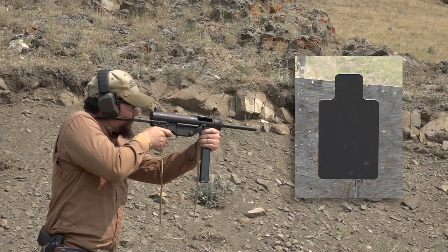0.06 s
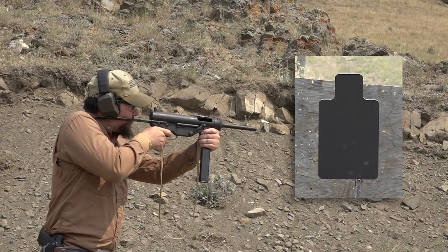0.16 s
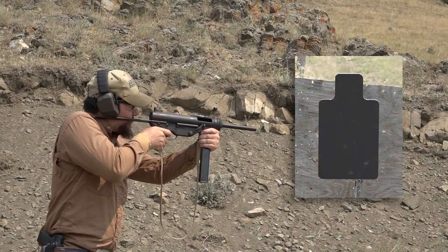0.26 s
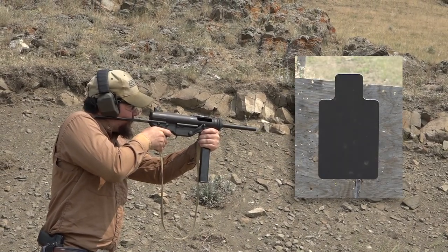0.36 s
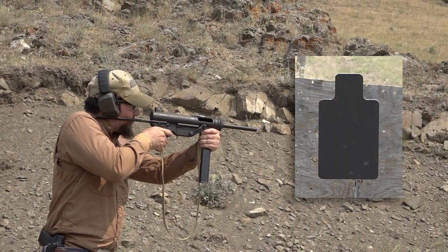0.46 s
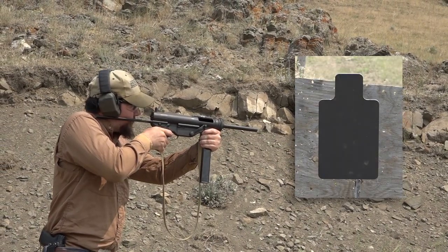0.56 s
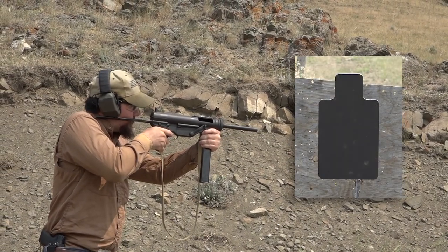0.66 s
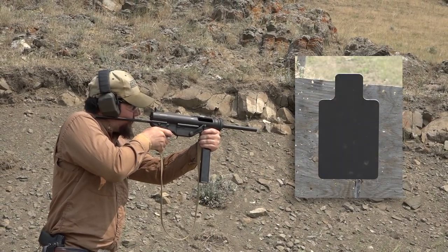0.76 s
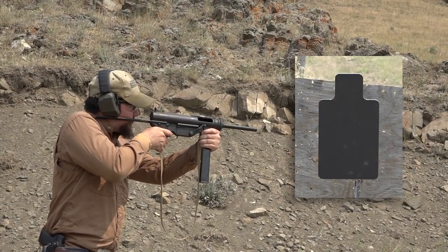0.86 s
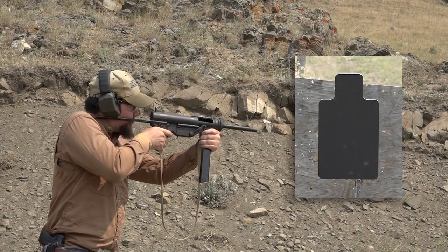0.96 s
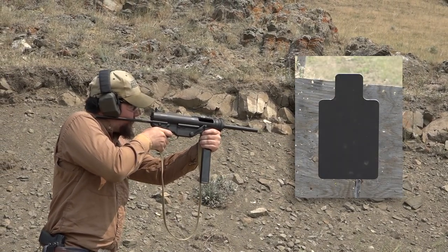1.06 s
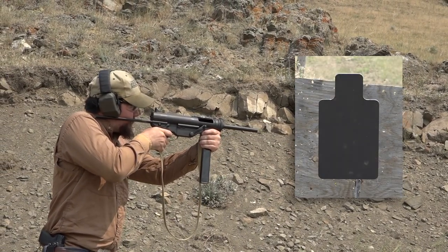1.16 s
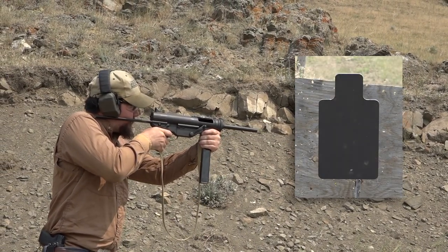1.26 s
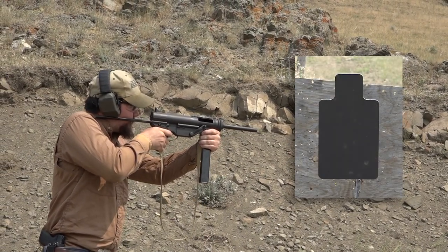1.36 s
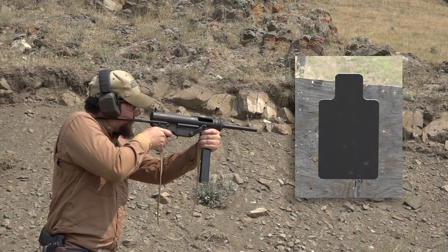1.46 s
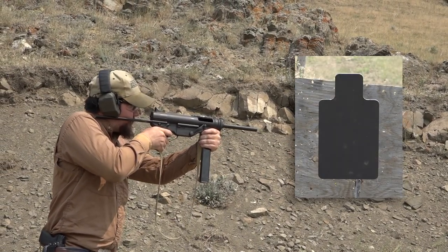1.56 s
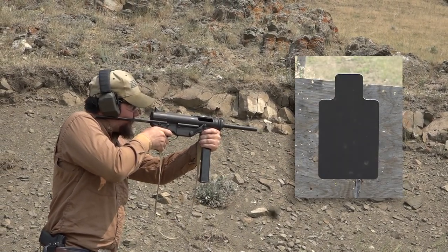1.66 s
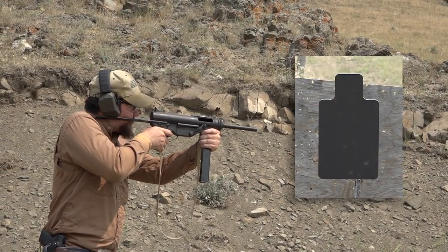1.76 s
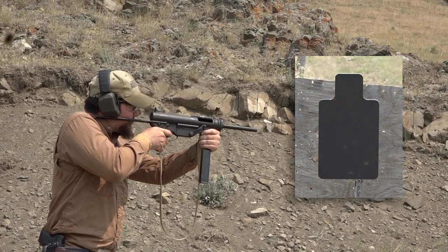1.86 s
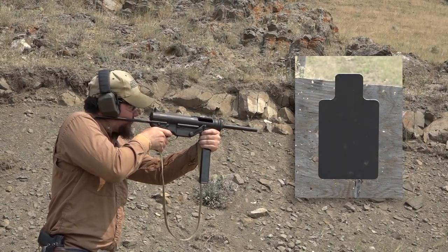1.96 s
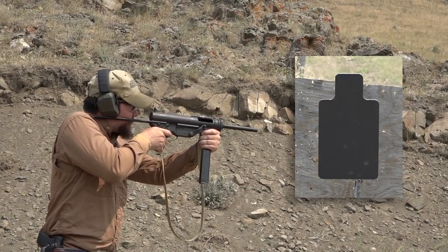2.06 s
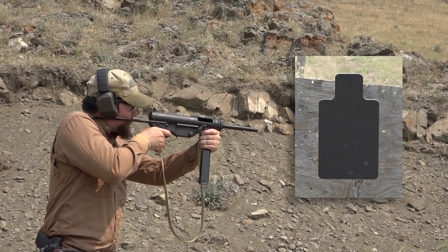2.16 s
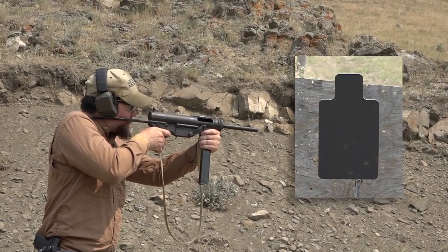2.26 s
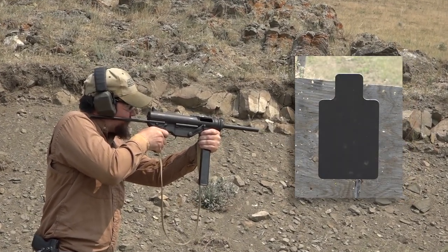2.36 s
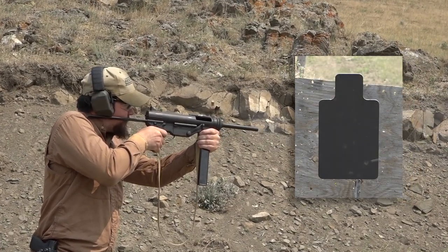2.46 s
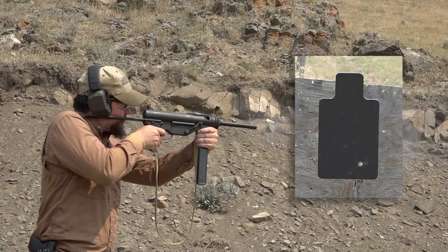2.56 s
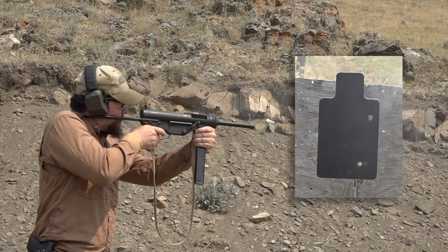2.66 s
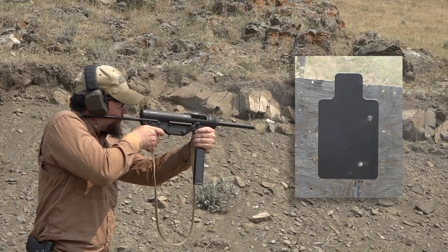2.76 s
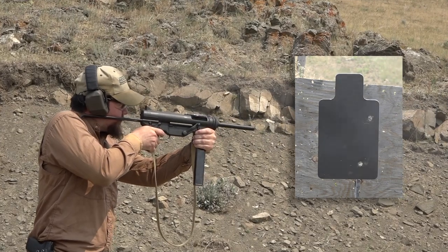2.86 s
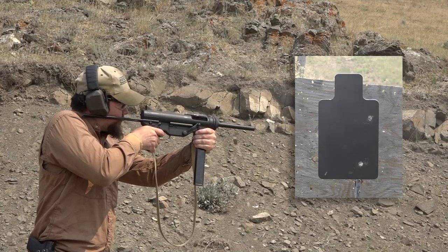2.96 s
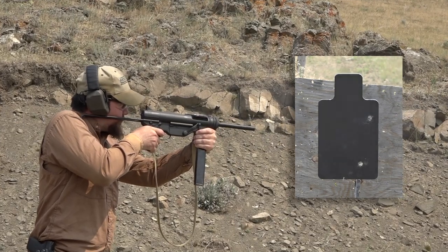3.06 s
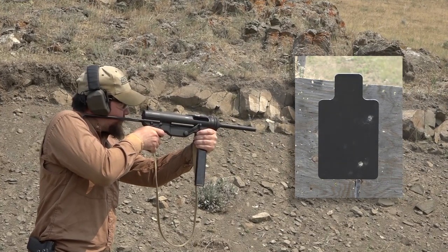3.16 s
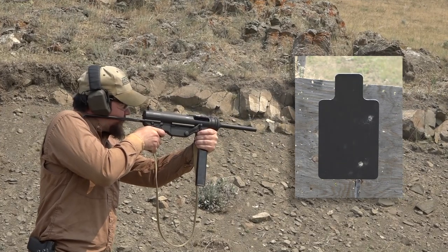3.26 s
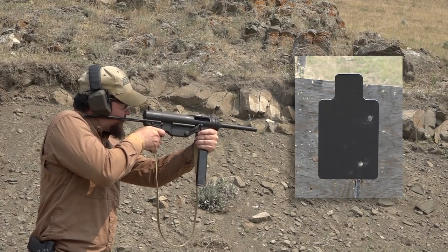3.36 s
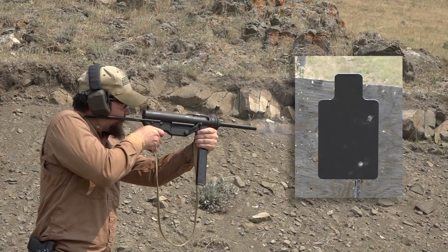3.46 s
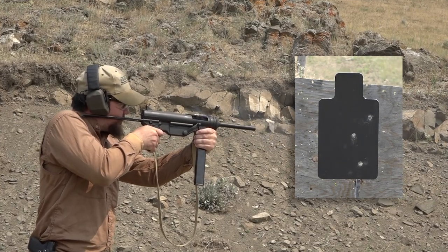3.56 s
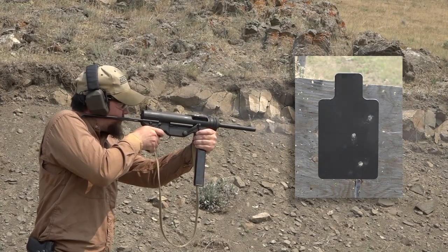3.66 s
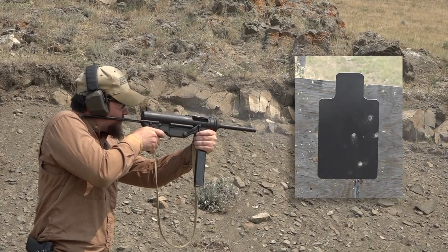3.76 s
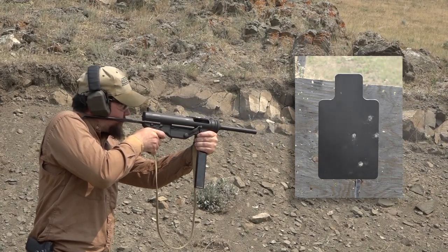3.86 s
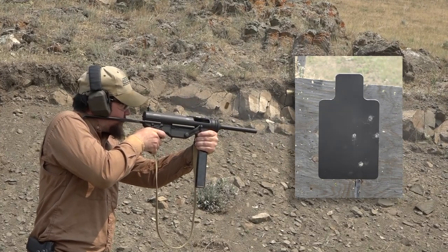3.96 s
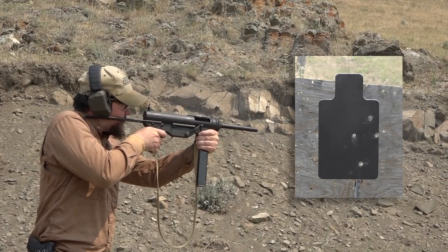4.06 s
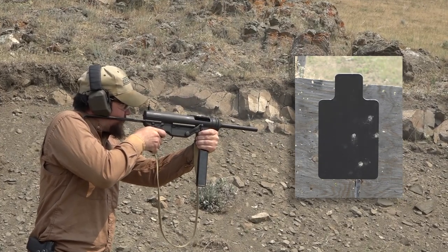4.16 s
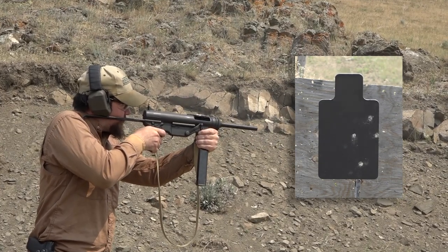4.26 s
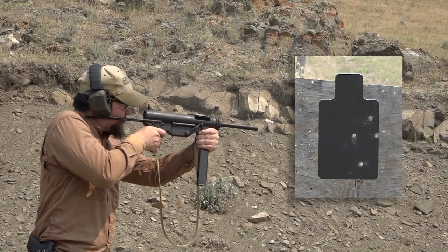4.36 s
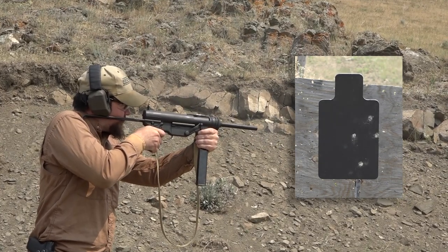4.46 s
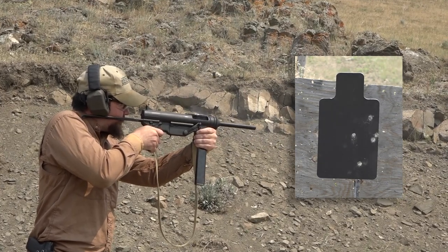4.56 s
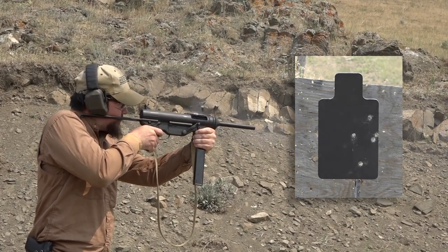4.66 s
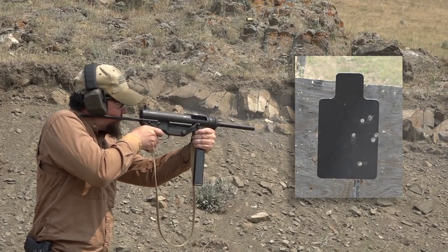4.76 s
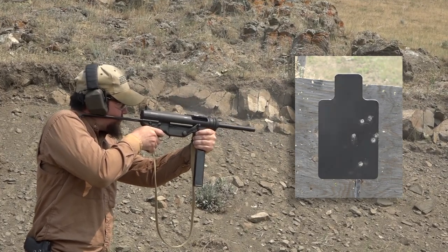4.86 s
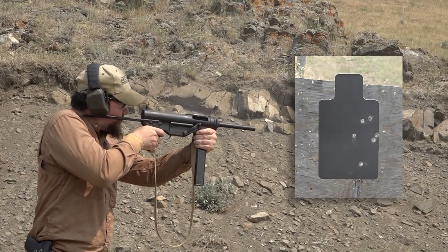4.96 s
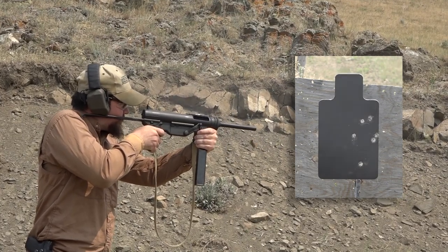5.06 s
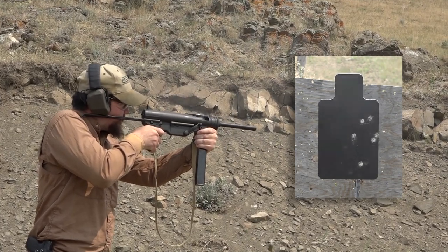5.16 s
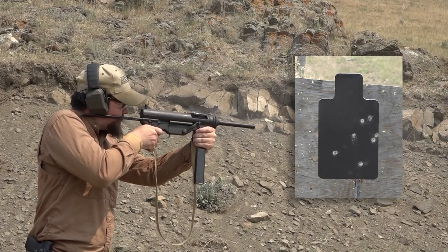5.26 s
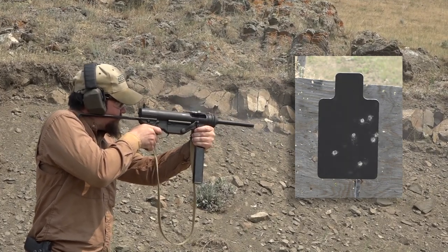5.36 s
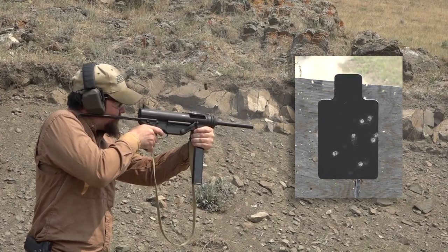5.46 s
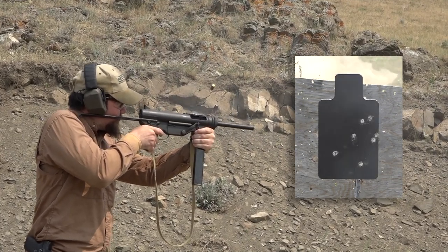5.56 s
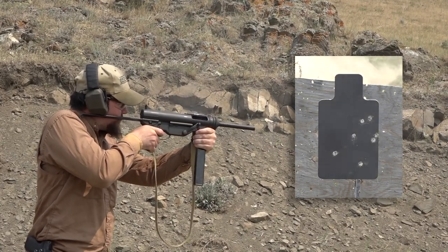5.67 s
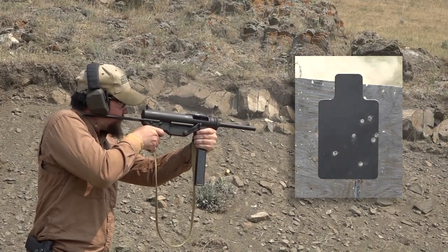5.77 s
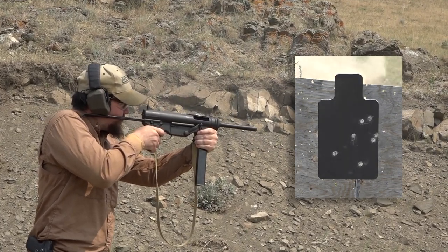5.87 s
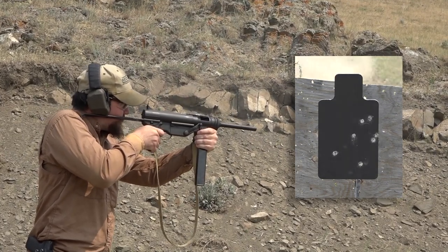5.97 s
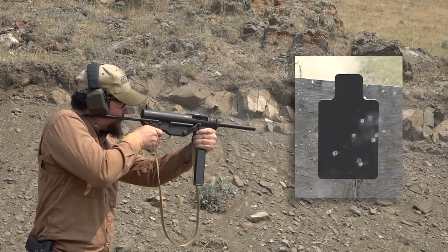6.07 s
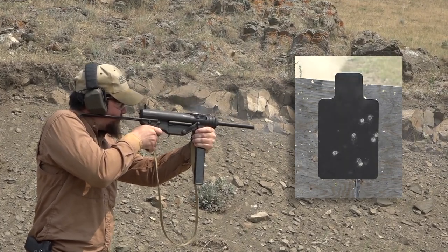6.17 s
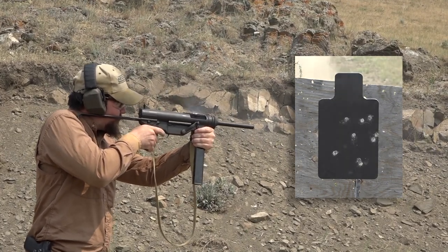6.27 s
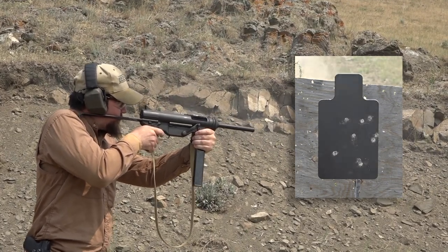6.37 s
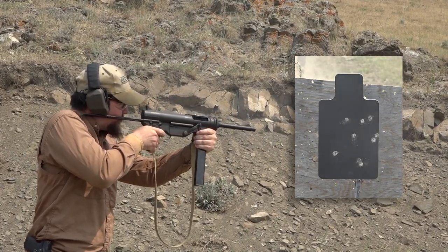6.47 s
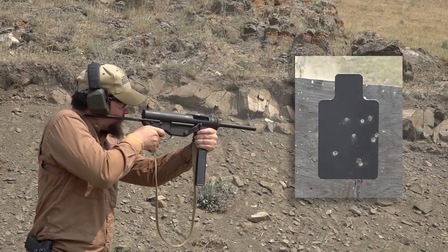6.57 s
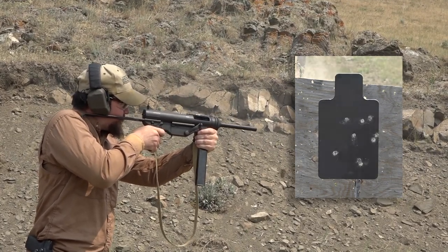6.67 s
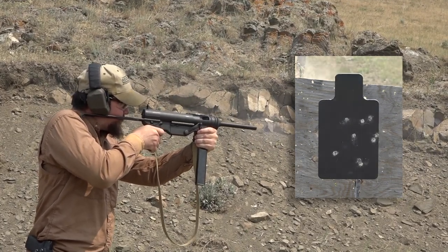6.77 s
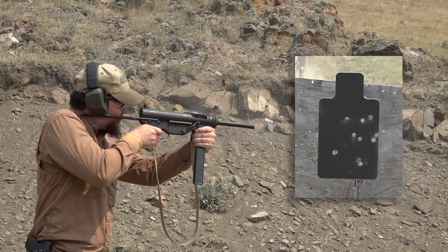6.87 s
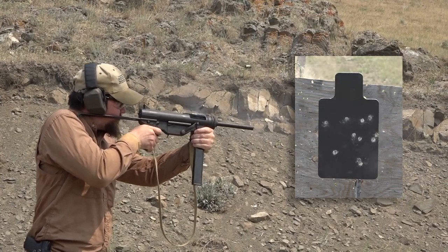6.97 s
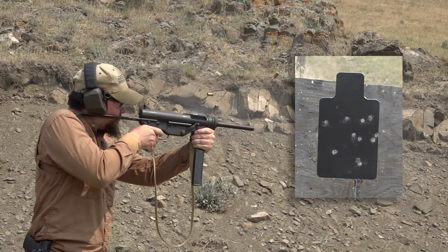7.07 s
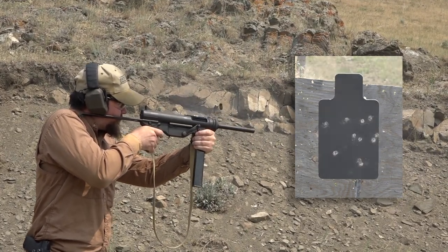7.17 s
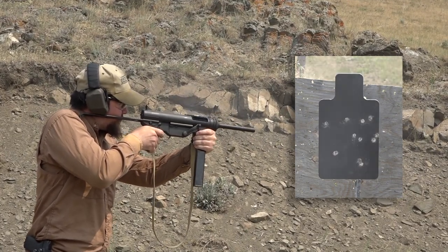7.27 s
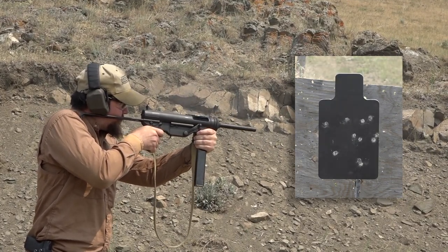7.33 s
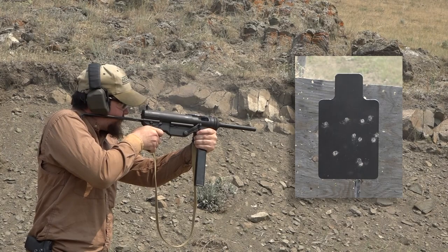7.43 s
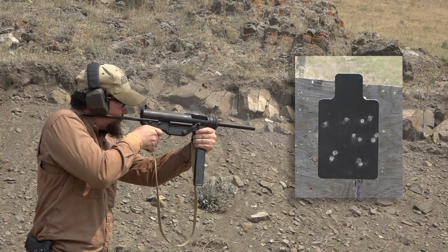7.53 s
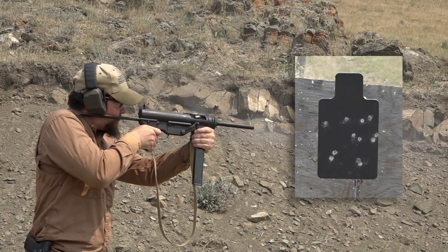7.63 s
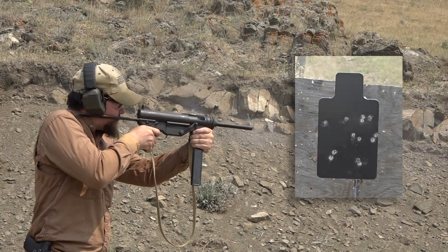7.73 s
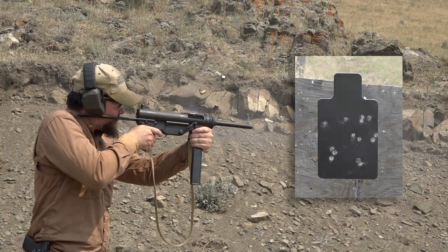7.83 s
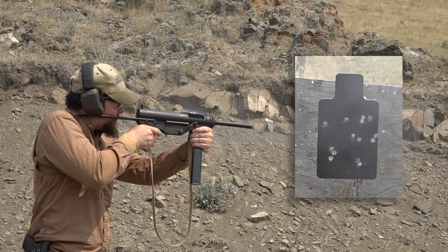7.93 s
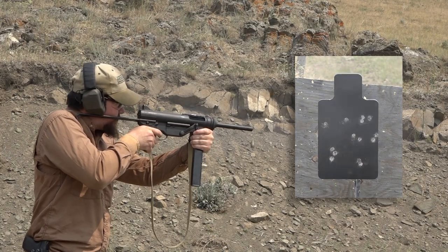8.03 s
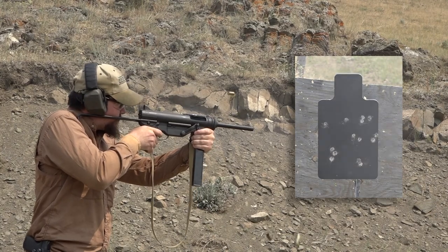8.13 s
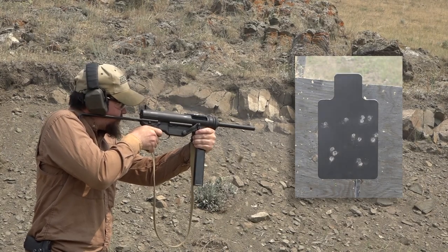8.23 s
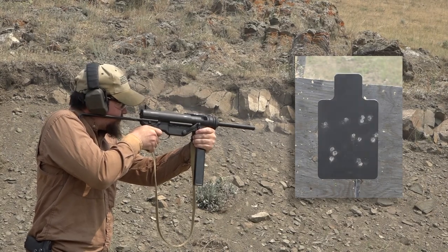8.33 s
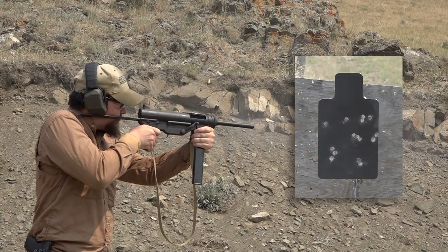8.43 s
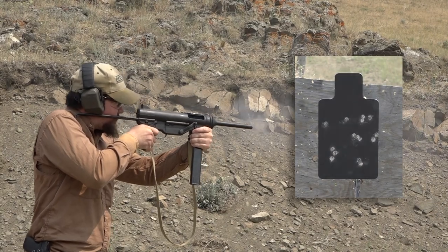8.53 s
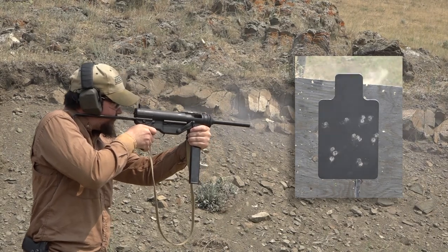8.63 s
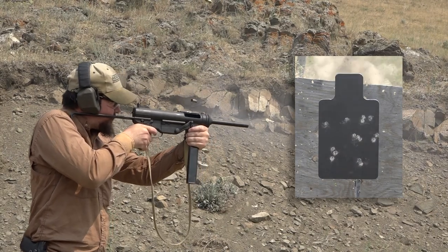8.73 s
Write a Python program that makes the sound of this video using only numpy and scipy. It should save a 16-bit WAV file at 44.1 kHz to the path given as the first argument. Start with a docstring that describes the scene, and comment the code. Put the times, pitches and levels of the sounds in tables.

```python
"""A rocky range on two microphones: left beside the shooter, right farther off, ahead of the muzzle.
First only wind, buffeting the near microphone and whistling at the far one. From about 2.5 s a submachine
gun fires short bursts at a steel plate: the bolt clatters, the blast scatters off the rocks, a bank slaps
back, the plate rings, the slopes answer and spent cases tick on stone. The recorder turns down after loud
sounds and creeps back up."""
import sys
import numpy as np
from scipy import signal
from scipy.fft import rfft, irfft, next_fast_len
from scipy.io import wavfile
from scipy.ndimage import uniform_filter1d, map_coordinates

SR = 44100
rng = np.random.default_rng(int(sys.argv[2]) if len(sys.argv) > 2 else 0)


def unload_wav(signal):
    """Save mono or channel-first audio to the path in sys.argv[1] as 16-bit WAV at rate SR, clipped to [-1, 1]."""
    wavfile.write(
        sys.argv[1],
        SR,
        np.round(np.clip(np.atleast_2d(signal).T, -1, 1) * 32767).astype(np.int16),
    )


N = 388080

# distant wind and microphone hiss: (frequency [Hz], level [dB])
AIR_SPECTRUM = [(18, -44), (30, -12), (65, -6), (101, -6), (268, -17), (306, -10), (506, -5), (659, -4),
                (953, 0), (1800, -15), (3380, -32), (15000, -32.5)]
# wind at the microphones: (time [s], near air [dB], far air [dB], buffet [dB], whistle [dB])
WIND_LEVELS = [(0, -54.5, -53.5, -42, -73), (.6, -56.5, -55.5, -36.5, -78), (1.2, -55.5, -55.5, -40, -85),
               (1.7, -55.5, -55, -34.5, -64), (2.1, -56.5, -55, -30, -53),
               (2.401, -53.5, -54.5, -37, -50.5), (3.299, -53.5, -57.5, -61.5, -80.5),
               (8.8, -63, -52.5, -62, -56)]
# whistle at the far microphone: (frequency [Hz], width [Hz], level [dB])
WHISTLE_BANDS = [(500, 60, -7), (800, 70, -3), (975, 60, 0), (1120, 80, -6), (1490, 45, -7)]
# gusts striking the near microphone: (time [s], level [dB], frequency [Hz])
GUSTS = [(1.075, -31, 151), (1.615, -34, 195), (1.643, -32, 140), (1.798, -25.5, 129), (1.904, -34, 110),
         (1.97, -36, 140), (2.087, -24, 177), (2.16, -27, 203), (2.178, -23.5, 119)]
# spent cases landing by the shooter: (time [s], level [dB])
CASE_LANDINGS = [(2.972, -37), (3.438, -43), (4.106, -43), (4.224, -48), (4.430, -42), (5.113, -40),
                 (5.695, -37), (5.796, -33.5), (5.852, -46), (5.922, -33), (6.607, -40), (6.716, -33),
                 (7.393, -42), (7.419, -32), (7.435, -27), (8.208, -40), (8.291, -44), (8.331, -21.5)]
# modes of the gun body: (frequency [Hz], level [dB], decay [factor])
BODY_MODES = [(500, -8, .6), (1800, -12, .3), (4900, -5, .4), (5250, 0, .5), (5600, -3, .45),
              (5950, -6, .4), (7600, -9, .3), (9300, -7, .4)]
# trigger pulls: (time [s], bolt release [dB], round stripped off the magazine [dB])
TRIGGER_PULLS = [(2.422, 9, -5.5), (3.473, -3, -15), (4.479, -3.5, -18), (5.198, -6.5, -18.5),
                 (6.012, -6, -15), (6.77, -7.5, -18), (7.476, -7, -18), (8.367, -7, -21), (8.675, -7, -15)]
# other ticks of trigger and bolt catch: (time [s], level [dB])
CATCH_TICKS = [(2.378, -39), (2.406, -32), (2.416, 3), (2.438, -20), (2.723, 8.5), (3.451, -30.5),
               (4.454, -29.5), (5.497, 9), (5.513, -23), (5.521, -4.5), (7.067, 5)]
# bullets on the plate, heard by the shooter: (time [s], clang [dB], across [0-1], up [0-1])
PLATE_HITS = [(2.59, -4, .62, 0.19), (2.735, -2.5, 0.41, 0.86), (3.642, -4, .86, 0.65),
              (3.79, -1.5, 0.33, 0.89), (4.646, -4, 0.15, .52), (4.793, -6, 0.15, 0.71),
              (5.362, -3.5, 0.42, 0.59), (6.176, -2.5, .38, .18), (6.323, -1.5, 0.82, .86),
              (6.935, -1, .36, 0.42), (7.077, -4, 0.364, 0.67), (7.641, -3, .38, .5),
              (7.786, -4.5, 0.39, 0.52), (7.928, -5.5, 0.86, 0.53), (8.528, -2.5, .88, .52)]
# clear plate modes: (frequency [Hz], near level [dB], far level [dB], t60 [s])
PLATE_MODES = [(646, -29, -31, 0.39), (991, -38, -33, 1.1), (1786, -15, -29, 0.28), (2346, -16, -23, 0.32),
               (2436, -19, -9, 0.25), (3023, -22, -22, 0.28), (3280, -15, -17, 0.19),
               (3365, -19, -18, 0.22), (3580, -17, -29, 0.3), (4916, -20, -8, 0.2), (5367, -22, -16, 0.25),
               (2190, -26, -22, 0.21), (4230, -55, -47, 0.7), (4339, -21, -19, 0.16),
               (4538, -26, -24, 0.26), (5141, -25, -23, 0.23), (5455, -29, -13, 0.19),
               (5612, -22, -22, 0.19), (6192, -23, -16, 0.19), (6883, -22, -17, 0.2),
               (7045, -35, -22, 0.26), (7200, -26, -27, 0.28), (7407, -19, -15, 0.19),
               (8290, -54, -37, 0.4), (8833, -34, -21, 0.17), (9184, -25, -29, 0.22),
               (10974, -34, -48, 0.42), (11818, -35, -49, 0.33), (13060, -13, -24, 0.14),
               (14686, -26, -44, 0.24)]
# nodal lines of the first eleven of these: (across [count], up [count])
NODAL_LINES = [(1, 1), (2, 3), (1, 2), (4, 4), (4, 2), (4, 3), (3, 3), (1, 4), (4, 5), (4, 6), (4, 1)]
# dense plate modes and lead splash: (frequency [Hz], level [dB])
SPLASH_SPECTRUM = [(120, -62), (200, -3.5), (1220, -5), (2510, -5.5), (3310, -8.5), (3770, -8), (4700, -7),
                   (15000, -19.5), (16500, -45)]
# their decay: (frequency [Hz], t60 [s])
SPLASH_T60 = [(400, 0.084), (2000, 0.18), (6000, 0.25), (15000, 0.17)]
# rounds, heard by the shooter: (time [s], blast [dB], bolt closing [dB])
ROUNDS = [(2.49, 0.5, 7), (2.637, 1.5, 6), (3.541, 2.5, -2), (3.689, 3.5, -0.5), (4.546, 1.5, -4),
          (4.693, 1.5, 7.5), (5.262, 2.5, -12.5), (5.409, 1, 2.5), (6.078, 1.5, -7), (6.225, 1.5, -1),
          (6.834, 2.5, -7), (6.980, 0, -3), (7.542, 2, -6.5), (7.688, 1, 0), (7.830, 1.5, 5),
          (8.430, 2, -3), (8.576, 2.5, 8.5), (8.733, 2, -1.5)]
# blast at the near microphone: (frequency [Hz], level [dB])
NEAR_BLAST = [(24, -46.5), (40, -17.5), (593, 0), (1030, -8), (1470, -5), (2370, -8), (7950, -17),
              (12800, -25.5), (15300, -19), (16500, -51.5)]
# blast at the far microphone: (frequency [Hz], level [dB])
FAR_BLAST = [(24, -45.5), (40, -22), (206, -11), (656, 2), (2560, 0.5), (5050, -3.5), (6830, -8),
             (8790, -16), (14900, -18.5), (16500, -42)]
# scatter off nearby rocks: (frequency [Hz], t60 [s])
ROCK_T60 = [(100, 0.028), (600, 0.29), (2500, 0.23), (8000, 0.19), (15000, 0.17)]
# answer of the distant slopes: (frequency [Hz], level [dB])
SLOPE_SPECTRUM = [(35, -73.5), (60, -46.5), (283, -35.5), (674, -4), (906, -33), (993, -12.5), (1060, -9),
                  (2420, -11.5), (14000, -40)]
# its decay: (frequency [Hz], t60 [s])
SLOPE_T60 = [(150, 0.2), (700, 1.32), (2000, 1), (5000, 1.15), (12000, 0.21)]
# slaps off banks: (near delay [s], far delay [s], near level [dB], far level [dB], pitch [factor])
BANK_ECHOES = [(.0830, .0920, 10.5, 0, 0.948), (.277, .285, -18.5, -28.5, 0.69),
               (0.443, .447, -29.5, -35.5, .7), (.468, .46, -31.5, -39, 0.81), (.505, .51, -35, -46, .65),
               (.59, .6, -39, -41.5, .65)]

FAR_S, PLATE_FAR_S = .015, .007  # extra travel to the far microphone from gun and plate
# each contact in the gun: (t60 [s], body ring [dB])
RELEASE, STRIP, CLOSE, REAR, TICK = (.027, -8), (.04, -10), (.06, 1), (.03, -16), (.026, -9)


def amp(db):
    return 10 ** (np.asarray(db) / 20)


def unit(x):
    return x / np.sqrt(np.mean(x ** 2) + 1e-20)


def along(points, hz):
    """Interpolate (frequency [Hz], value) points on a log axis."""
    f, v = np.transpose(points)
    return np.interp(np.log(hz + 1), np.log(f + 1), v)


def filtered(x, response):
    """Shape x by a function of frequency."""
    m = next_fast_len(N + SR // 4)
    return irfft(rfft(x, m) * response(np.fft.rfftfreq(m, 1 / SR)), m)[..., :N]


def add(track, s, sound):
    """Mix a sound into a track at s seconds."""
    part = track[round(s * SR):][:len(sound)]
    part += sound[:len(part)]


def wobble(rate, size=N):
    """Smooth random curve that changes rate times a second."""
    knots = rng.standard_normal(int(size * rate / SR) + 4)
    return map_coordinates(knots, [np.arange(size) * rate / SR])


def lumps(size, rate, depth_db):
    """Randomly wavering gain."""
    return amp(depth_db * wobble(rate, size))


def dying_noise(spectrum, decays, size, rise_s):
    """Noise that rises, then dies at its own speed in each band."""
    hz, t, bands = signal.stft(rng.standard_normal(size), SR, nperseg=256)
    colour = unit(amp(along(spectrum, hz)))[:, None]
    decay = amp(-60 * t / along(decays, hz)[:, None])
    noise = signal.istft(bands * colour * decay, SR, nperseg=256)[1][:size]
    return noise * (1 - np.exp(-np.arange(size) / SR / rise_s))


def ring(modes, size, spread_db, stretch=1):
    """Damped modes at random strengths and phases; the upper ones beat with a close twin."""
    hz, db, t60 = np.transpose(modes)[:, :, None]
    t = np.arange(size) / SR
    strength, phase, detune = rng.standard_normal((3, len(modes), 1))
    twin = .45 * (hz > 1500) * np.sin(2 * np.pi * hz * (1 + .004 * detune) * t)
    wave = np.sin(2 * np.pi * hz * t + 3 * phase) + twin
    return np.sum(amp(db + spread_db * strength - 60 * t / (t60 * stretch)) * wave, 0)


def wind():
    """Unrelated air at each microphone, low buffets on the near one, a wavering whistle at the far one."""
    times, *levels = np.transpose(WIND_LEVELS)
    near_db, far_db, buffet_db, whistle_db = [np.interp(np.arange(N) / SR, times, db) for db in levels]
    air = unit(filtered(rng.standard_normal((2, N)), lambda hz: amp(along(AIR_SPECTRUM, hz))))
    push = amp(buffet_db + 4.4 * wobble(23)) * rng.standard_normal(N)
    # a broad resonance at 115 Hz, dulled above 450 Hz
    buffet = filtered(push, lambda f: 90j * f / (115 ** 2 - f * f + 90j * f) / (1 + (f / 450) ** 2))
    t = np.arange(SR // 20) / SR
    for s, db, hz in GUSTS:
        add(buffet, s, amp(db) * np.exp(-t / .0026) * np.sin(2 * np.pi * hz * t))
    tone = filtered(rng.standard_normal(N), lambda f: sum(
        amp(db) / (1 + (2 * (f - hz) / width) ** 2) for hz, width, db in WHISTLE_BANDS))
    air *= amp([near_db + .63 * wobble(9.9), far_db + .62 * wobble(2.6)])
    whistle = amp(whistle_db + 1.9 * wobble(3.2)) * unit(tone)
    return air + [buffet, whistle]


def cases():
    """Brass on stone by the shooter: short bright ticks."""
    near, t = np.zeros(N), np.arange(SR // 30) / SR
    for s, db in CASE_LANDINGS:
        bright = np.diff(rng.standard_normal(len(t) + 1))
        add(near, s, bright * amp(db - 60 * t / .02) * (1 - np.exp(-t / .0012)))
    return np.array([near, amp(-8) * np.roll(near, round(FAR_S * SR))])


def bolt():
    """Steel contacts inside the gun, close to the near microphone, faint and dull at the far one."""
    near, t = np.zeros(N), np.arange(SR // 10) / SR
    contacts = ([(s, db, *RELEASE) for s, db, _ in TRIGGER_PULLS]
                + [(s + .037, db, *STRIP) for s, _, db in TRIGGER_PULLS]
                + [(s - .0155, db, *CLOSE) for s, _, db in ROUNDS]
                + [(s + .092, -9, *REAR) for s, *_ in ROUNDS]  # the bolt reaches the rear of its travel
                + [(s, db, *TICK) for s, db in CATCH_TICKS])
    for s, db, t60, ring_db in contacts:
        decay = amp(-60 * t / t60) + amp(-31 - 60 * t / .16)  # stones nearby prolong it
        rattle = uniform_filter1d(rng.standard_normal(len(t)), size=2) * decay
        rise = (1 - np.exp(-t / (.035 * t60))) ** 2  # long scrapes swell slowly
        swell = lumps(len(t), 400, depth_db=2) * rise
        body = amp(ring_db) * ring(BODY_MODES, len(t), spread_db=3, stretch=t60)
        add(near, s, amp(db) * (body + rattle) * swell)
    dull = filtered(near, lambda hz: 1 / (1 + (hz / 6000) ** 2))
    return np.array([near, amp(-12.5) * np.roll(dull, round(FAR_S * SR))])


def plate():
    """Downrange, each bullet rings the plate's clear modes over many weaker ones and a splash of lead."""
    out, t = np.zeros((2, N)), np.arange(SR * 4 // 5) / SR
    hz, near_db, far_db, t60 = np.transpose(PLATE_MODES)
    dense_hz = rng.uniform(600, 15800, size=170)  # a plate's modes lie evenly thick in frequency
    dense_t60 = along(SPLASH_T60, dense_hz) * rng.uniform(.6, 1.3, size=170)
    dense_modes = np.transpose([dense_hz, along(SPLASH_SPECTRUM, dense_hz), dense_t60])
    dense = ring(dense_modes, len(t), spread_db=2)
    dense /= np.std(dense[:SR // 50])
    ends = [s for s, *_ in PLATE_HITS[1:]] + [N / SR]
    for (s, clang_db, across, up), end in zip(PLATE_HITS, ends):
        # the clear modes ring and die away, faded out as the next bullet strikes
        gate = (1 - np.exp(-t / .01)) * np.clip((end - s - t) / .004, 0, 1)
        # a mode struck on a nodal line barely sounds
        shape = [np.cos(np.pi * m * across) * np.cos(np.pi * n * up) for m, n in NODAL_LINES]
        shape_db = 21.5 + 20 * np.log10(np.abs(shape) + .053)
        strike_db = np.r_[shape_db, rng.normal(8, 5, size=len(hz) - len(shape))]
        for mic, mode_db in enumerate((near_db, far_db)):
            clear = gate * ring(np.transpose([hz, mode_db + strike_db, t60]), len(t), spread_db=1)
            blow = rng.standard_normal(400) * np.exp(-t[:400] / .0027)  # each bullet breaks up its own way
            clang = signal.fftconvolve(dense, blow / np.linalg.norm(blow))[:len(t)]
            splash = 1.17 * dying_noise(SPLASH_SPECTRUM, SPLASH_T60, len(t), rise_s=.00016)
            add(out[mic], s + mic * PLATE_FAR_S, clear + amp(clang_db + .5 * mic) * (clang + splash))
    return out


def bank_slap(pitch):
    """The blast as a rough, sloping bank returns it: a few gritty cycles that fall in pitch."""
    progress = np.linspace(0, 1, round(.0038 * SR / max(pitch, .7)))
    hz = pitch * 2100 * (520 / 2100) ** progress
    grit = .98 * pitch ** 3 * uniform_filter1d(rng.standard_normal(SR // 50), size=5)[:len(hz)]
    return (grit - np.sin(2 * np.pi * np.cumsum(hz) / SR)) * np.sin(np.pi * progress ** 1.44)


def gun(thump_s=.00047):
    """The muzzle blast and its returns from rocks, slopes and banks; pairs are (near, far) microphone."""
    out, t = np.zeros((2, N)), np.arange(SR // 2) / SR
    thump = (1 - t / thump_s) * np.exp(-t / thump_s)  # first push of the blast
    for s, blast_db, _ in ROUNDS:
        for mic, spectrum in enumerate((NEAR_BLAST, FAR_BLAST)):
            arrival = s + mic * FAR_S
            front = 1 + (1.3, .8)[mic] * np.exp(-t / (.006, .009)[mic])
            # single rocks and folds of the slope answer one by one, in lumps
            scatter = front * lumps(len(t), 700, depth_db=2.3)
            scatter *= dying_noise(spectrum, ROCK_T60, len(t), rise_s=(.0004, .0012)[mic])
            slopes = lumps(SR, 60, depth_db=3.5) * lumps(SR, 300, depth_db=2)
            slopes *= dying_noise(SLOPE_SPECTRUM, SLOPE_T60, SR, rise_s=.023)
            far_ridge = slopes[:len(t)] * np.exp(-t / .047)
            blast = scatter + amp((-4.5, -8.5)[mic]) * thump
            add(out[mic], arrival, amp(blast_db + 3 * mic) * blast)  # louder ahead of the muzzle
            add(out[mic], arrival, amp((-24, -25)[mic]) * slopes)
            add(out[mic], s + .3, amp((-27, -28)[mic]) * far_ridge)
            for near_s, far_s, near_db, far_db, pitch in BANK_ECHOES:
                echo_db = (near_db, far_db)[mic] + rng.normal(0, 1)
                add(out[mic], s + (near_s, far_s)[mic], amp(echo_db) * bank_slap(pitch))
    return out


def scene():
    """The range as it reaches the two microphones."""
    return gun() + plate() + bolt() + cases() + wind()


def record(dry, duck_db=-10, recover_s=1.6, low_hz=45, top_hz=15900):
    """Gain drops at loud sounds and creeps back; a fast stage squeezes what stays loud; peaks round off."""
    n = np.arange(N)
    last_loud = np.maximum.accumulate(np.where(np.abs(dry).max(0) > .6, n, -99 * SR))
    gain_db = duck_db * np.exp(-(n - last_loud) / SR / recover_s)
    ducked = dry * amp(uniform_filter1d(gain_db, size=21))
    pole = np.exp(-1 / (.0077 * SR))
    power = signal.lfilter([1 - pole], [1, -pole], ducked ** 2)
    squeezed = ducked * (1 + power / .098 ** 2) ** -.22
    rounded = squeezed / (1 + np.abs(squeezed / .9) ** 4) ** (1 / 4)
    return filtered(rounded, lambda hz: 1 / (1 + (hz / top_hz) ** 300) / (1 + (low_hz / (hz + 1)) ** 2))


dry = scene()
out = record(dry)
unload_wav(out)
```